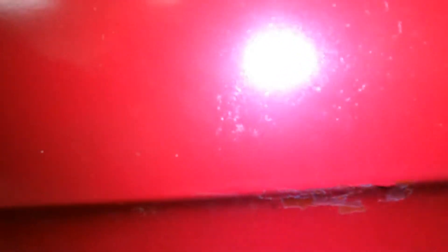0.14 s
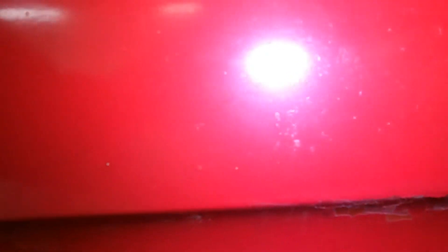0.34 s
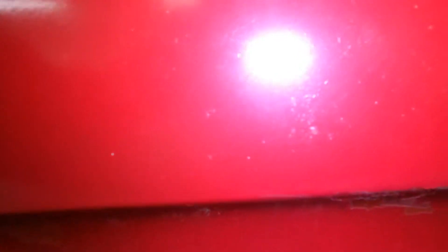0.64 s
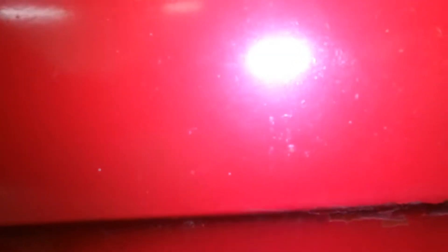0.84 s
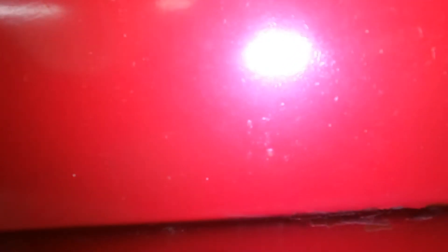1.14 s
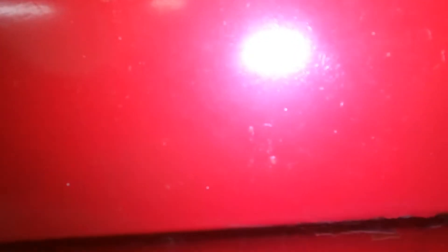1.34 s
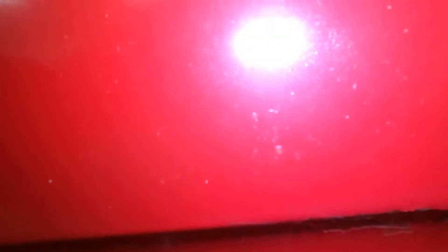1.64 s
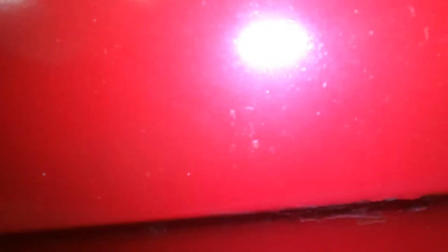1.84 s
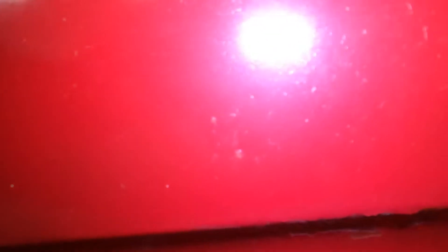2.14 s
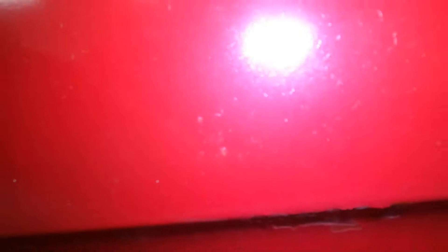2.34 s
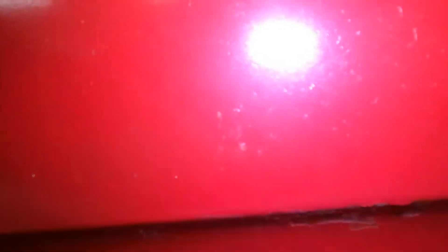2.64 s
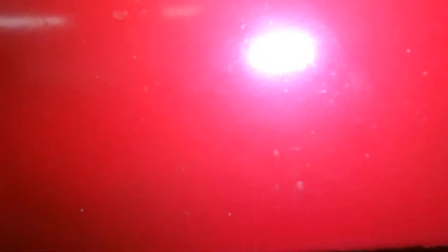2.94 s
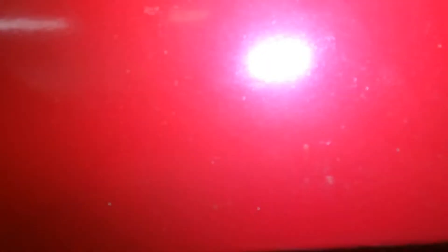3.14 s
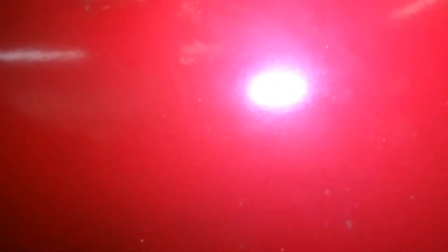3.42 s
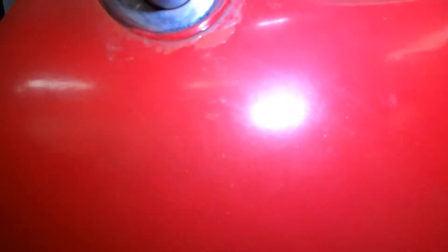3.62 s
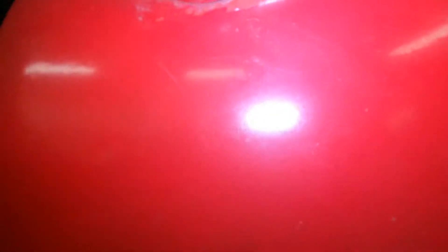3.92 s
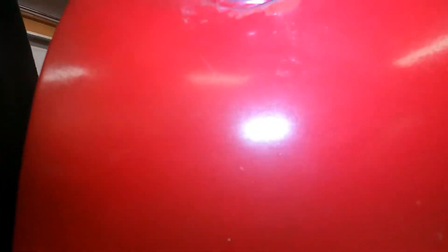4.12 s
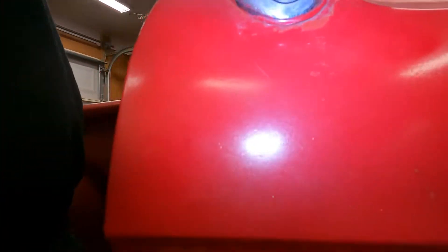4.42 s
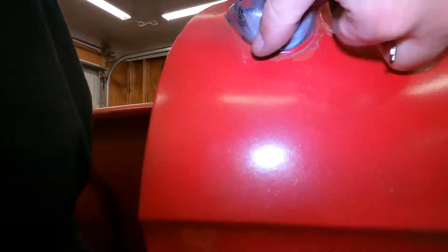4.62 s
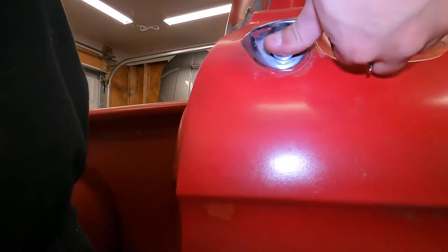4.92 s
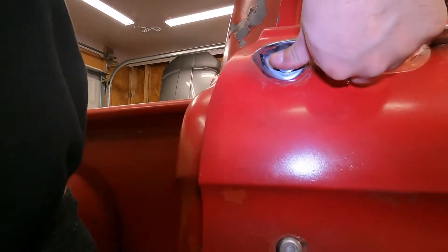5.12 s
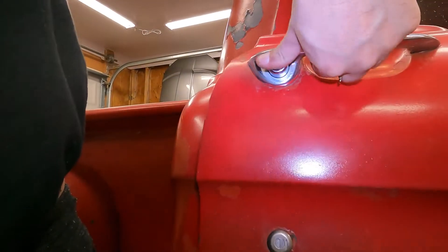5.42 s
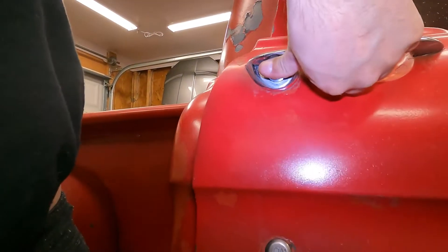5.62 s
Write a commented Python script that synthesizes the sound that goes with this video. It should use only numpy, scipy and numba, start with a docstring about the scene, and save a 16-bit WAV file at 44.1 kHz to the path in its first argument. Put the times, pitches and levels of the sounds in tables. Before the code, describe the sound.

Heard close to a steel vehicle door in a garage, over faint steady air noise with a low hum. A dull thump opens, then small bumps and a soft double knock come around 0.3-0.55 s with seal rubbing. Firm hollow clunks follow: a quick double at 1.15 s, one hard, sharper clack at 1.8 s, and a heavy group at 2.4-2.5 s. A softer, loose thud lands near 3 s. Hands scuff over the paint and fingertips drum a few light, dry taps between 3.4 and 3.8 s. Two muted door knocks come at 4.15 and 4.5 s. From 4.65 to 5 s the push-button clicks and scrapes, with linkage rattle, springy ringing and a thin high squeak. After a near-quiet pause, a sharper cluster snaps at 5.5-5.7 s, with a loud click, a brief squeak and rattling. Each strong impact leaves a short, diffuse room echo.

```python
"""A steel vehicle door is pushed against its latch several times in a garage, heard close to the panel.
Each knock thumps the panel modes, clunks the frame modes and cracks in bare noise bursts; hands slide and the seal rubs.
Then fingers drum on the skin by short soft pushes, and the door knocks twice more.
Last, a thumb works the handle's push-button: linkage and spring modes click and rattle, wavering tones squeak.
A steady noise of air lies under it all; a diffuse tail of decaying noise bands is the garage's echo."""
import sys
import numpy as np
from scipy import signal
from scipy.fft import rfft, irfft, next_fast_len
from scipy.io import wavfile
from scipy.ndimage import uniform_filter1d
from numba import njit

SR = 44100
rng = np.random.default_rng(int(sys.argv[2]) if len(sys.argv) > 2 else 0)


def log_audio(samples):
    """Write samples as a 16-bit WAV file to the path given in sys.argv[1]."""
    # one column per channel
    frames = np.atleast_2d(samples).T
    # limit to full scale, then quantise
    limited = np.clip(frames, -1, 1)
    pcm = np.round(limited * 32767).astype(np.int16)
    wavfile.write(sys.argv[1], SR, pcm)


N = 254456

# resonances of the door panel: (frequency [Hz], t60 [s], relative level [dB])
PANEL_MODES = [(50.3, 0.72, -3.5), (107.2, 0.92, -2), (166.4, 0.23, -11), (199.4, 0.41, -6.5),
               (226.3, 0.23, 4.5), (272.3, 0.17, 6), (317.4, 0.26, 3.5), (348.5, 0.32, -2),
               (391.4, 0.49, -2.5), (408.3, 0.31, -7)]
# resonances of the door frame: (frequency [Hz], t60 [s], relative level [dB])
FRAME_MODES = [(489, 0.09, -9), (573.7, 0.067, 3.5), (630, 0.11, 1), (699, 0.067, -2), (784, 0.08, -4),
               (847.7, 0.15, -7), (948, 0.14, -8), (1052, 0.069, -8.5), (1260, 0.06, -9.5),
               (1546, 0.05, -12.5)]
# resonances of the push-button linkage: (frequency [Hz], t60 [s], relative level [dB])
LINKAGE_MODES = [(901, 0.1, 1), (1244, 0.05, 4), (1625, 0.036, 5), (1843, 0.11, 2), (2050, 0.23, -3.5),
                 (2500, 0.09, -4), (2763, 0.17, -0.5), (3210, 0.078, -6.5), (3950, 0.056, -10),
                 (4770, 0.036, -11.5)]


def undb(db):
    """Amplitude ratio of a level in dB."""
    return 10 ** (np.asarray(db) / 20)


def fall(s, t60):
    """Exponential decay of 60 dB in t60 seconds."""
    return np.exp(-np.log(1000) * s / np.maximum(t60, 1e-3))


def colour(x, points):
    """Filter by (frequency [Hz], gain [dB]) points, joined over log frequency."""
    hz, db = np.transpose(points)
    n = next_fast_len(len(x) + 4096)
    bins_hz = np.maximum(np.arange(n // 2 + 1) * SR / n, 1)
    gain = undb(np.interp(np.log(bins_hz), np.log(hz), db))
    return irfft(rfft(x, n) * gain, n)[:len(x)]


def unit(x):
    """Scale to an RMS of 1."""
    return x / np.sqrt(np.mean(x ** 2))


def crest(y):
    """Scale so that the loudest 3.6 ms peak near 1."""
    return y / np.sqrt(4 * uniform_filter1d(y ** 2, size=160).max())


def band(x, lo_hz, hi_hz):
    """Butterworth band-pass."""
    sos = signal.butter(2, [lo_hz, min(hi_hz, .45 * SR)], "band", fs=SR, output="sos")
    return signal.sosfilt(sos, x)


def smooth_noise(length, size):
    """Noise averaged over size samples, RMS 1."""
    return unit(uniform_filter1d(rng.standard_normal(length), size=size))


def add(track, s, y):
    """Mix y into the track at s seconds."""
    i = max(int(s * SR), 0)
    track[i:i + len(y)] += y[:N - i]


@njit
def turn(steps, sizes, length):
    """Sum of spinning, shrinking pointers: damped sines."""
    y = np.zeros(length)
    for k in range(len(steps)):
        z = sizes[k] + 0j
        for i in range(length):
            y[i] += z.imag
            z *= steps[k]
    return y


def ring(modes, scatter_db, tilt_db=0, crowd=0.017, count=4, seconds=.7):
    """Response to a blow at a chance spot: each mode is a crowd of close neighbours that beat; peak 1."""
    hz, t60, db = np.repeat(np.array(modes, float), count, axis=0).T
    level_spot, pitch_spot = rng.standard_normal((2, len(hz)))
    # tilt_db raises the lowest mode
    size = undb(db + scatter_db * level_spot + tilt_db * (hz == hz.min()))
    spin = 2j * np.pi * hz * (1 + crowd * pitch_spot)
    decay = np.log(1000) / np.maximum(t60, 1e-3)
    step = np.exp((spin - decay) / SR)
    # build-up with a time constant of half a cycle, so the lows come late
    onset = step * np.exp(-hz / 0.5 / SR)
    y = turn(np.r_[step, onset], np.r_[size, -size], int(seconds * SR))
    return y / np.abs(y).max()


def chatter(seconds, spread_db=2.5, body_db=-60, body_t60=.2):
    """Parts bounce in dense small shocks that die away (t60 = 3 * seconds); thin sheet buzzes on behind."""
    s = np.arange(int(.3 * SR)) / SR
    shocks = rng.standard_normal(len(s)) * undb(spread_db * rng.exponential(size=len(s)))
    return shocks * (fall(s, 3 * seconds) + undb(body_db) * fall(s, body_t60))


def strike(drive, response):
    """The drive excites a resonant response."""
    return crest(signal.fftconvolve(drive, response))


def crack(drive, lo_hz, hi_hz):
    """The bare shocks, too dense in modes to ring at a pitch."""
    return crest(band(drive, lo_hz, hi_hz))


def pressure(rows, attack_s, growth_db, release_db_per_s):
    """Power of rumble and hiss: each contact sets in, grows until it ends, then fades."""
    t, power = np.arange(N) / SR, 0
    for start_s, length_s, rumble_db, hiss_db in rows:
        left_s = start_s + length_s - t
        db = np.where(left_s > 0, -growth_db * left_s / length_s, release_db_per_s * left_s)
        gain = np.clip((t - start_s) / attack_s, 0, 1) * undb(db)
        power = power + (gain * undb([[rumble_db], [hiss_db]])) ** 2
    return power


def air():
    """Steady coloured noise."""
    # spectrum of the air noise: (frequency [Hz], relative level [dB])
    air_spectrum = [(15, -45.5), (25, -38), (82, -17.5), (118, 7.5), (144, -14), (179, -19.5), (911, -12.5),
                    (1770, -13.5), (6070, -31), (9000, -27.5), (11700, -74.5), (19800, -120)]
    rms_db = -61.5
    return undb(rms_db) * unit(colour(rng.standard_normal(N), air_spectrum))


def garage(x):
    """Adds a diffuse tail of noise bands whose treble dies sooner than the bass."""
    # reverberation of the garage: (frequency [Hz], t60 [s])
    decay_times = [(60, 0.79), (250, 0.7), (1000, 0.51), (3000, 0.37), (6000, 0.4), (12000, 0.34)]
    tail_db, onset_s = -9, 0.0019
    s = np.arange(int(1.2 * SR)) / SR
    hz, t60 = np.transpose(decay_times)
    tail = np.zeros(len(s))
    for centre_hz in 45 * 2. ** np.arange(9):
        octave = band(rng.standard_normal(len(s)), centre_hz / np.sqrt(2), centre_hz * np.sqrt(2))
        tail += octave * fall(s, np.interp(np.log(centre_hz), np.log(hz), t60))
    tail *= np.minimum(s / onset_s, 1)
    tail /= np.sqrt(np.sum(tail ** 2))
    return x + undb(tail_db) * signal.fftconvolve(x, tail)[:N]


def ticks():
    """Uneven stick-slip ticks of the plunger ring the linkage briefly."""
    ticks_per_s, spread_db = 420, 3
    chance, size_chance = rng.random((N, 2)).T
    slips = (chance < ticks_per_s / SR) * undb(-spread_db * np.log(1 - size_chance))
    response = ring(LINKAGE_MODES, 2.3, crowd=0.033, count=6, seconds=.1)
    damped = response * fall(np.arange(int(.1 * SR)) / SR, 0.045)
    return unit(signal.fftconvolve(slips, damped)[:N])


def grain():
    """Friction noise of uneven strength."""
    return rng.standard_normal(N) * undb(1.2 * smooth_noise(N, 300))


def rubbing():
    """Grainy friction rumbles in the panel, scuffs on the seal and hisses off the paint; the plunger ticks."""
    # door creeping onto its seal: (start [s], length [s], end rumble [dB], end scuff [dB])
    drags = [(.36, .165, -38.5, -43.5), (1.076, 0.096, -37, -34.5), (1.706, .071, -29.5, -36),
             (2.185, .12, -38, -62), (2.32, 0.063, -30, -38), (2.8, .175, -44, -47)]
    # hands sliding over the paint: (start [s], length [s], end rumble [dB], end hiss [dB])
    slides = [(-.1, 0.17, -37.5, -59.5), (.27, 0.051, -49, -56.5), (.4, 0.072, -58, -49),
              (1.02, .06, -48, -51.5), (2.86, 0.073, -47, -56), (3.23, 0.034, -67.5, -51.5),
              (3.34, 0.068, -60, -47.5), (3.47, 0.1, -50.5, -44), (3.6, 0.11, -43.5, -43),
              (3.79, 0.061, -61, -34.5), (4.15, 0.076, -39, -48.5), (4.26, .09, -56.5, -45.5),
              (4.41, 0.044, -49.5, -48.5), (4.52, 0.12, -48, -54), (5.18, 0.13, -69, -58.5)]
    # thumb dragging the plunger in its sleeve: (start [s], length [s], end rumble [dB], end hiss [dB])
    strokes = [(4.66, 0.13, -34.5, -57), (4.82, 0.046, -32.5, -33), (4.9, 0.14, -37.5, -36.5),
               (4.98, 0.049, -33, -41.5), (5.485, .03, -21.5, -35.5), (5.56, 0.16, -26, -35),
               (5.66, 0.018, -38, -50)]
    # contact envelopes: (attack [s], growth over the length [dB], release [dB/s])
    drag_shape = (0.012, 7.8, 180)
    slide_shape = (0.01, 11, 93.4)
    stroke_shape = (0.043, 1.6, 170)
    # hands resting on the door: (rumble [dB], hiss [dB])
    rest_db = (-59.5, -71)
    # hiss off the paint: (frequency [Hz], relative level [dB])
    hiss_spectrum = [(290, -10.5), (500, -2), (788, -5), (892, -12.5), (969, -10), (1410, -10.5),
                     (2010, -8.5), (4360, -13.5), (12100, -32), (13500, -46.5)]
    # scuff of the rubber seal: (frequency [Hz], relative level [dB])
    scuff_spectrum = [(300, -3.5), (700, -1.5), (1500, -5), (2000, -15.5), (4500, -23.5), (8000, -39),
                      (13000, -52.5)]
    ticks_re_hiss_db = -1.5

    seal_rumble, seal_scuff = pressure(drags, *drag_shape)
    thumb = pressure(strokes, *stroke_shape)
    hands_rumble, hands_hiss = pressure(slides, *slide_shape) + thumb + undb(rest_db)[:, None] ** 2
    response = ring(PANEL_MODES[1:] + FRAME_MODES, 0, crowd=0.06, count=8)
    damped = response * fall(np.arange(int(.7 * SR)) / SR, 0.23)
    rumble = unit(signal.fftconvolve(grain(), damped)[:N])
    hiss = unit(colour(grain(), hiss_spectrum))
    scuff = unit(colour(grain(), scuff_spectrum))
    out = rumble * np.sqrt(seal_rumble + hands_rumble)
    out += hiss * np.sqrt(hands_hiss)
    out += scuff * np.sqrt(seal_scuff)
    out += undb(ticks_re_hiss_db) * ticks() * np.sqrt(thumb[1])
    return out


def fingers():
    """Soft pads push the skin for under half a millisecond; the nail ticks."""
    # fingertip blows: (time [s], level [dB], nail re pad [dB], boost of the lowest mode [dB])
    tap_rows = [(3.425, -20.5, -40, 14.5), (3.554, -13, -12.5, 3), (3.566, -14, -19.5, -1.5),
                (3.621, -13, -13.5, 12), (3.738, -8, -16, 0), (3.75, -22.5, -30, 6.5),
                (3.808, -16, -22, 10.5)]
    # resonances of the skin: (frequency [Hz], t60 [s], relative level [dB])
    skin_modes = [(188.2, 0.22, -16), (356.2, 0.056, 3), (421, 0.061, -5.5), (634, 0.033, -4),
                  (766, 0.047, -10), (1050, 0.037, -16)]
    out = np.zeros(N)
    for s, db, nail_db, low_db in tap_rows:
        push = np.hanning(int(0.0004 * SR))
        response = ring(skin_modes, 2.3, low_db, crowd=0.014, count=1, seconds=0.19)
        add(out, s, undb(db) * strike(push, response))
        add(out, s, undb(db + nail_db) * crack(chatter(0.0039), 660, 1900))
    return out


def squeaking():
    """Dry stick-slip of plunger and seal: a wavering, sinking tone with its octave."""
    # squeaks: (time [s], level [dB], starting pitch [Hz], octave re pitch [dB], slow-part t60 [s],
    # RMS waver [share of pitch])
    squeaks = [(0.484, -48, 2610, -33, 0.25, 0.036), (4.754, -17.5, 6100, -5, 0.12, 0.03),
               (5.021, -40, 6780, -55, 0.16, 0.027), (5.211, -48.5, 1261, -15, 0.55, .006),
               (5.551, -14, 2935, -38, 0.036, 0.015)]
    out, t = np.zeros(N), np.arange(int(.4 * SR)) / SR
    stop = np.clip((.19 - t) / .01, 0, 1)  # comes to rest by 0.19 s
    for s, db, hz, octave_db, t60, share in squeaks:
        waver, flutter = smooth_noise(len(t), 110), smooth_noise(len(t), 110)
        phase = 2 * np.pi * np.cumsum(hz * (1 + share * waver - 0.23 * t)) / SR
        tone = np.sin(phase) + undb(octave_db) * np.sin(2 * phase)
        decay = fall(t, t60) + 1.9 * fall(t, 0.058)
        attack = np.minimum(t / 0.006, 1)
        add(out, s, undb(db + 4.9 * flutter) * tone * decay * attack * stop)
    return out


def button():
    """Clicks ring the linkage and shake the panel, jolts ring the return spring; squeaks are added."""
    # clicks of button and linkage: (time [s], click [dB], panel thump [dB], top [dB],
    # chatter [s, a third of its t60], linkage ring re click [dB], upper edge of click [Hz])
    clicks = [(4.644, -15, -15.5, -28, .02, -22, 4100), (4.659, -6, -29, -33, 0.024, -8, 4430),
              (4.773, -16, -24.5, -49, 0.032, -22, 2520), (4.821, -24, -23, -49, 0.0054, 0.5, 2720),
              (4.851, -24, -22.5, -52, 0.033, 0.5, 3300), (4.886, -21, -34.5, -59, 0.056, -24, 2150),
              (4.915, -30, -37, -56, 0.016, -1, 5450), (4.954, -12, -21.5, -36, 0.014, -2.5, 4930),
              (5.033, -42, -31, -59, 0.016, -12, 2500), (5.206, -43, -66, -59, 0.26, -13, 3240),
              (5.506, -21, -34.5, -31.5, 0.012, -3.5, 4780), (5.522, -23.5, -24.5, -52, 0.083, -1, 3840),
              (5.549, -4, -14, -8, 0.014, -15, 6100), (5.574, -20, -23.5, -22, 0.0094, -3, 2980),
              (5.631, -10, -21, -38, 0.043, -12, 4040), (5.640, -12.5, -36, -27, 0.039, -9.5, 4400),
              (5.671, -28, -33.5, -35, 0.032, -1, 4430), (5.694, -36, -27, -48, 0.014, -14, 2960)]
    # jolts of the return spring: (time [s], level [dB])
    twangs = [(4.659, -22), (4.913, -35), (4.954, -26), (5.548, -28), (5.64, -22)]
    # resonances of the return spring: (frequency [Hz], t60 [s], relative level [dB])
    spring_modes = [(5000, 0.2, 5), (7000, .06, -16.5), (8350, 0.23, -3), (10540, 0.28, -6.5)]
    out, t = squeaking(), np.arange(int(.4 * SR)) / SR
    for s, db, thump_db, top_db, chatter_s, ring_db, reach_hz in clicks:
        drive = chatter(chatter_s)
        linkage = ring(LINKAGE_MODES, 1.78, crowd=.03, count=6, seconds=0.33)
        body = ring(PANEL_MODES[2:] + FRAME_MODES[:4], 3.3, count=3, seconds=.4) * fall(t, 1.0)
        add(out, s, undb(db + ring_db) * strike(drive, linkage))
        add(out, s, undb(db) * crack(band(drive, 100, 1.09 * reach_hz), 530, reach_hz))
        add(out, s, undb(thump_db) * strike(drive, body))
        add(out, s, undb(top_db) * crack(drive, 3000, 18000))
    for s, db in twangs:
        spring = ring(spring_modes, 0.93, crowd=.014, count=8, seconds=.3)
        add(out, s, undb(db) * strike(chatter(.015), spring))
    return out


def door():
    """Each knock thumps the panel, clunks the frame and cracks at the striker."""
    # door meeting latch or stop: (time [s], panel thump [dB], frame clunk [dB], striker crack [dB],
    # chatter [s, a third of its t60], boost of sway modes [dB], fullest thump pitch [Hz], upper edge of crack [Hz])
    knocks = [(0.002, -17, -31, -42.5, 0.039, 11, 249, 2500),
              (0.281, -50.5, -40, -51, 0.047, -6, 303, 3500),
              (0.347, -40, -35, -40.5, 0.0092, -7, 220, 3000),
              (0.379, -41.5, -34.5, -64, 0.017, -6, 220, 2500),
              (0.449, -35, -34.5, -55, 0.013, -19, 209, 3000),
              (0.527, -18, -24.5, -60.5, 0.01, -3, 199, 2500), (0.541, -18, -22, -58, 0.028, 8, 197, 2500),
              (1.135, -8, -5.5, -17, 0.0084, -10, 217, 2780),
              (1.18, -8.5, -8.5, -19.5, 0.0081, -1.5, 195, 3000),
              (1.198, -13.5, -30.5, -29, 0.023, 4, 198, 2500), (1.779, -4.5, -5, -7, 0.0095, -8, 207, 5000),
              (2.256, -25.5, -40, -61, 0.013, 3, 270, 2500),
              (2.378, -11.5, -7, -15, 0.011, -3.5, 221, 2890),
              (2.462, -3.5, -5.5, -14.5, 0.018, 0.5, 259, 2870),
              (2.484, -9, -20, -36.5, 0.019, 3.5, 254, 2500),
              (2.775, -44.5, -37.5, -43.5, 0.0059, 7, 209, 3000),
              (2.806, -35, -36.5, -48, 0.012, -9, 211, 2500),
              (2.978, -26, -24.5, -39, 0.09, 5.5, 340, 2000),
              (2.995, -14.5, -21, -38.5, 0.052, -4, 284, 2050),
              (4.145, -19.5, -41.5, -59, 0.0041, 0, 265, 2500),
              (4.47, -25.5, -29, -55, 0.035, 4.5, 248, 3000)]
    sway_below_hz = 130  # modes of the whole door swaying
    focus_db_per_octave = 7.5  # a thump thins away from its fullest pitch
    out = np.zeros(N)
    for s, thump_db, clunk_db, crack_db, chatter_s, sway_db, full_hz, reach_hz in knocks:
        drive = chatter(chatter_s)
        struck = []
        for hz, t60, mode_db in PANEL_MODES:
            sway = sway_db * (hz < sway_below_hz)
            focus = focus_db_per_octave * abs(np.log2(hz / full_hz))
            struck.append((hz, t60, mode_db + sway - focus))
        panel = ring(struck, 1.5, crowd=.035, count=6, seconds=0.66)
        frame = ring(FRAME_MODES, 0.99, crowd=0.07, count=9, seconds=.25)
        shocks = chatter(chatter_s, body_db=-17, body_t60=0.49)
        add(out, s, undb(thump_db) * strike(band(drive, 20, 690), panel))
        add(out, s, undb(clunk_db) * strike(drive, frame))
        add(out, s, undb(crack_db) * crack(shocks, 870, reach_hz))
    return out


def scene():
    """All sources with the garage's echo, alike in both channels."""
    taps = fingers()
    # the fingertips drum right beside the microphone, so their echo is faint
    echoing = garage(door() + button() + 0.16 * taps)
    mid = echoing + 0.73 * taps + rubbing() + air()
    return np.array([mid, mid])


def record(dry):
    """Microphone colour, rounded peaks, slight stereo width in the treble, steep top cut."""
    # microphone response: (frequency [Hz], gain [dB])
    mic_response = [(25, -22), (50, -4.5), (75, -11.5), (150, 2), (5000, 0), (7500, -5.5), (9100, -19),
                    (10500, -12), (12300, -6), (13500, -24.5)]
    top_hz, side_db = 13700, -4.5
    mid = np.tanh(colour(dry.mean(axis=0), mic_response))
    width = unit(uniform_filter1d(smooth_noise(N, 70), size=70))
    treble = colour(mid, [(2000, -70), (5000, -36), (7500, -8), (10000, 0)])
    side = undb(side_db) * width * treble
    top_cut = signal.ellip(8, .2, 70, top_hz, fs=SR, output="sos")
    return signal.sosfilt(top_cut, np.array([mid + side, mid - side]))


dry = scene()
out = record(dry)
log_audio(out)
```